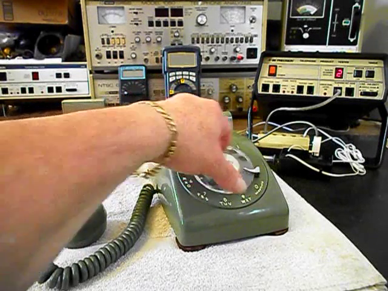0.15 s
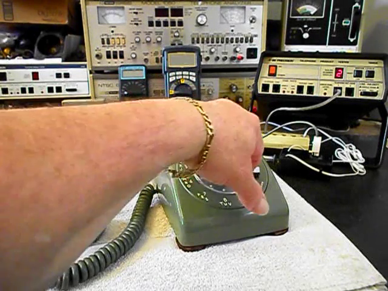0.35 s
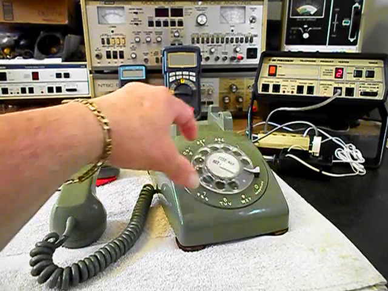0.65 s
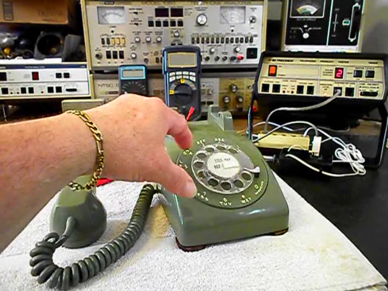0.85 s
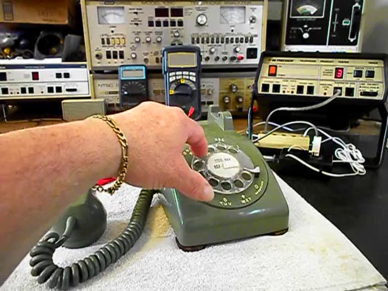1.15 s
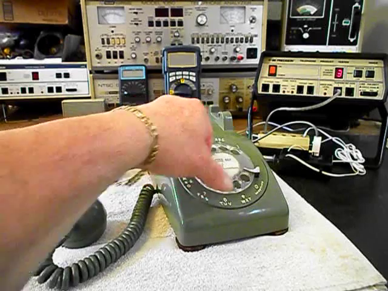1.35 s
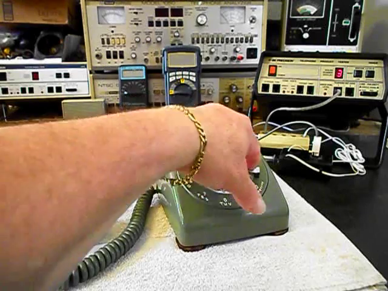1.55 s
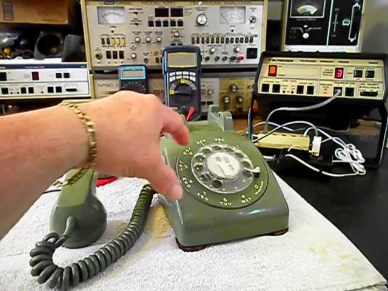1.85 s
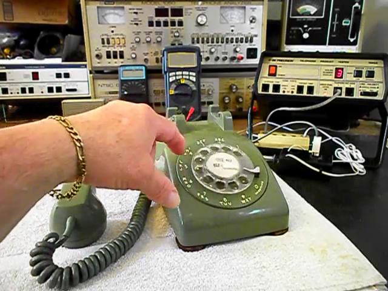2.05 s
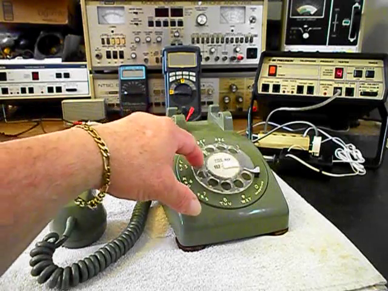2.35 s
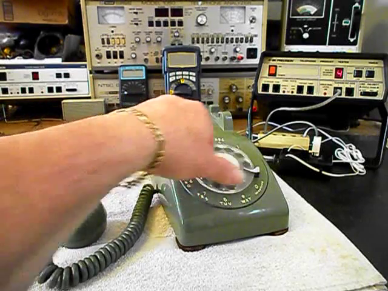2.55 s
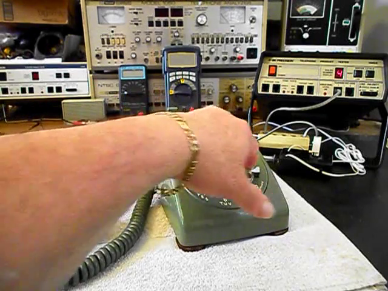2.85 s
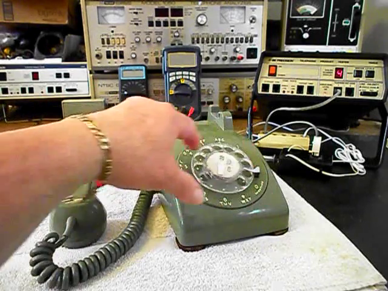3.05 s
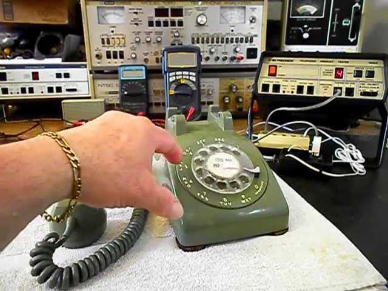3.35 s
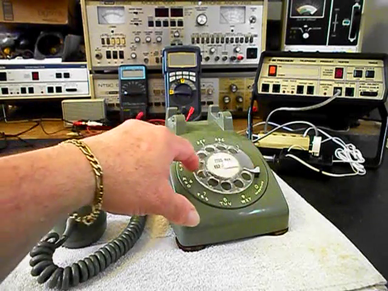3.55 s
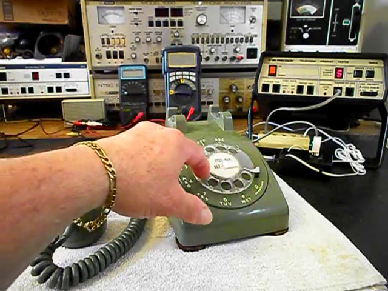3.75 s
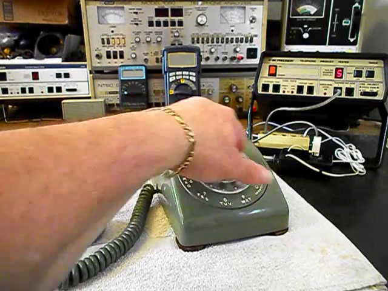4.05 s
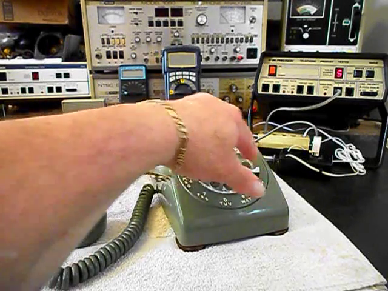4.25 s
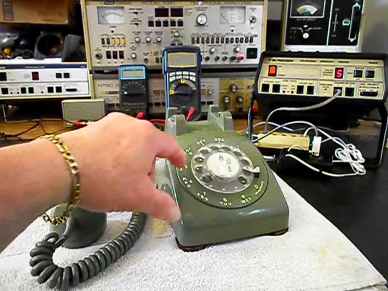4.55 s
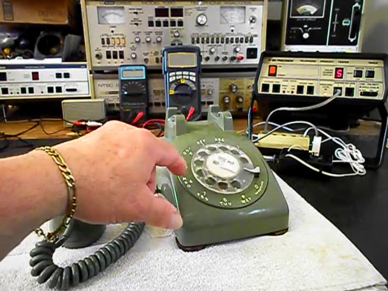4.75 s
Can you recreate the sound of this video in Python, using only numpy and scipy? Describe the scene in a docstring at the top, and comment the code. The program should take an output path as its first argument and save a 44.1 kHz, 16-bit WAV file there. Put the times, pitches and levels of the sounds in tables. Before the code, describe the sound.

A rotary desk telephone is dialled four times, heard close in a small workshop with a short, soft echo, quiet air and barely audible electrical hum. At the very start a fingertip taps into a hole; the wheel is pulled with a brief rattling rasp and knocks the stop at 0.27 s. A small click at 0.4 frees it, and it whirrs back, a low-pitched buzzing of gears with a fine brake hiss, clacking home at 0.8. The second grip comes at 1.3, knock at 1.5, return from 1.63 to a clack at 2.1. The third grips at 2.43, knocks at 2.7 and whirrs from 2.84 to 3.39. The fourth grips at 3.8, knocks hardest at 4.1, gives a louder slip click near 4.23 and runs longest, clacking at 4.87. Each whirr quickly reaches speed, then slows and softens slightly. Tiny finger brushes and nail ticks come between turns.

```python
"""Close by, a rotary desk telephone is dialled four times in a small workshop with a faint hum.
Each time a finger drops into a hole, winds the wheel round with a rasp and knocks on the finger stop.
The spring then runs the wheel back: gears whirr, a brake hisses, and the wheel clacks home.
Blows are short bursts of random pulses through filters, plus a ringing case.
Rubbing is a stream of tiny random contacts; the gears add tones that follow the wheel's speed."""
import sys
import numpy as np
from scipy import signal
from scipy.fft import rfft, irfft, next_fast_len
from scipy.io import wavfile
from scipy.ndimage import map_coordinates

SR = 44100
rng = np.random.default_rng(int(sys.argv[2]) if len(sys.argv) > 2 else 0)


def unload_audio(sound):
    """Save the sound as a 16-bit wav file, at the path given as the first command line argument."""
    columns = np.transpose(np.atleast_2d(sound))
    # keep every value between -1 and 1, then stretch to whole-number steps
    steps = np.round(np.clip(columns, -1, 1) * 32767)
    wavfile.write(sys.argv[1], SR, steps.astype(np.int16))


N = 216451
T = np.arange(N) / SR  # the whole scene, in seconds
HIT_T = np.arange(SR // 2) / SR  # the half second allowed for one blow

# Background air noise. Each row: frequency in Hz, relative level in dB per Hz.
AIR_COLOUR = [(25, -35), (70, -8.5), (115, -1), (200, -2.5), (400, 1), (700, -8), (1000, -8), (1500, -12),
              (2500, -10.5), (3900, -16), (6800, -21), (8000, -39)]
# Steady hum of the bench instruments. Each row: frequency in Hz, relative level in dB.
HUM_TONES = [(398.4, -74.5), (662.1, -62), (899.0, -68.5), (2482, -72)]
# How fast the room's echo dies. Each row: frequency in Hz, time to fall by 60 dB in seconds.
ROOM_DECAY = [(150, 0.79), (500, 0.3), (2000, 0.36), (7000, .36)]
# Ringing of the case and its metal parts.
# Each row: frequency in Hz, relative level in dB, time to fall by 60 dB in seconds.
CASE_MODES = [(360.3, 3.5, 0.095), (462.4, 7, 0.083), (538, 0, .09), (916, -6, 0.17), (1085, -7.5, 0.086),
              (1616, -14.5, 0.24), (2214, -23, 0.26), (2600, -20.5, 0.12)]

# The next ten tables are sound colours. Each row: frequency in Hz, relative level in dB per Hz.
# The fingertip's soft thud.
THUD_COLOUR = [(80, -28.5), (250, -9.5), (420, 4.5), (700, -10), (1000, -4), (1600, -22.5), (3000, -59)]
# The wheel's plastic click.
PLASTIC_COLOUR = [(600, -36.5), (1200, -5), (1900, 0), (2500, 3.5), (3200, -13.5), (5000, -42)]
# The fingernail's tick.
TICK_COLOUR = [(2000, -27), (3500, -11.5), (4400, 10), (5500, -4.5), (7300, -5), (8300, -35.5)]
# The knock on the finger stop.
KNOCK_COLOUR = [(59, -65.5), (100, -27), (354, -13), (661, -9.5), (1050, 4), (1650, -13.5), (2180, -14.5),
                (2610, -7.5), (3030, -17), (3770, -23), (4530, -17.5), (6780, -15.5), (7570, -38),
                (8000, -29.5), (10400, -61), (17600, -120)]
# The wheel hitting its rest.
CLACK_COLOUR = [(60, -34.5), (150, -16.5), (270, -13), (400, -2.5), (600, -1), (950, -0.5), (1350, -8),
                (1700, -2.5), (2100, -6), (3200, -4.5), (3900, -8.5), (4500, 0.5), (5200, -7.5), (6900, -5),
                (7500, -14), (8300, -27)]
# The shivering spring.
SPRING_COLOUR = [(4000, -36), (6100, -20.5), (6650, 5.5), (7100, 2), (7500, -23), (8300, -52.5)]
# Loose gears rattling during a pull.
RATTLE_COLOUR = [(88, -55.5), (150, -24), (205, -27), (301, -15.5), (483, 3), (570, -5), (640, -0.5),
                 (720, -7.5), (828, -10), (906, 5), (980, -9.5), (1100, -0.5), (1200, -16.5), (1268, -4.5),
                 (1350, -15.5), (1550, -18.5), (2200, -25), (2860, -39.5), (4840, -120)]
# The clutch scraping during a pull.
SCRAPE_COLOUR = [(1000, -38), (1700, -10), (2320, -8.5), (2690, -3.5), (3010, -17), (3320, -6),
                 (3810, -18.5), (4210, -1.5), (4510, 0), (5100, -7), (5600, -5.5), (6070, -11), (7140, -5),
                 (7500, -18), (9750, -39.5), (16500, -120)]
# The gears as heard through the case on the way back.
GEAR_COLOUR = [(100, -33), (260, -21.5), (350, -3), (460, 2.5), (620, -5), (780, -13.5), (900, 2.5),
               (1000, -2), (1110, -2), (1330, -19.5), (1460, -11.5), (1700, -13), (2400, -13),
               (3200, -18.5), (3900, -33)]
# The hissing brake shoes.
BRAKE_COLOUR = [(2800, -73), (3400, -9), (3850, -15), (4150, -3.5), (4500, 6.5), (4850, -12), (5400, -9),
                (6200, -9.5), (6900, -5.5), (7600, -15), (8300, -67.5)]

# The finger drops into a hole. Each row: start in seconds, level in dB, nail tick in relative dB.
GRIPS = [(0.0187, -19, -20), (1.3084, -19.5, -34.5), (2.4306, -22.5, -26), (3.7945, -25.5, -29)]
# Make-up of a grip: thud in relative dB, plastic click in relative dB.
GRIP_MIX = (-14, -12)
# The hovering hand brushes the wheel. Each row: start in seconds, level in dB, nail tick in relative dB.
BRUSHES = [(0.067, -30, -32), (1.075, -40, -13.5), (1.202, -36, -19), (2.313, -33.5, -22),
           (2.377, -34.5, -3), (3.542, -27, -14), (3.683, -34.5, -12), (3.834, -45.5, 1.5)]
# Make-up of a brush: thud in relative dB, plastic click in relative dB.
BRUSH_MIX = (-8, -11.5)
# Make-up of the finger slipping off: thud, plastic click and nail tick, all in relative dB.
RELEASE_MIX = (-14, -14.5, -13.5)
# The finger hits the stop.
# Each row: start in seconds, level in dB, nail tick in relative dB, low thump in relative dB.
STOPS = [(0.272, -7, -11.5, -32.5), (1.507, -10, -17, -33.5), (2.716, -8, -4.5, -39),
         (4.108, -5, -8.5, -24)]
# The wheel is pulled round. Each row: start in seconds, attack length in seconds, end in seconds,
# gear rattle in relative dB, scrape in dB, growth in dB per second,
# moment of the hardest shove in seconds, shove in dB.
PULLS = [(0.113, 0.049, 0.272, -29, -29.5, 13.5, 0.183, 2),
         (1.354, .044, 1.505, -24, -26, 55.5, 1.452, 1.5), (2.48, 0.027, 2.714, -25, -28, 40, 2.602, 5.5),
         (3.866, 0.013, 4.105, -25, -26, 48, 3.89, 5.5)]
# The wheel runs back; the finger's slipping-off click falls near its start,
# in the fourth row shortly after it. Each row: slipping-off click in seconds, its level in dB,
# wheel start in seconds, gears in relative dB, brake hiss in relative dB,
# arrival home in seconds, clack level in dB.
RETURNS = [(0.384, -19.5, 0.41, -35, -39, 0.79, -5), (1.609, -22.5, 1.627, -34, -38.5, 2.098, -4),
           (2.814, -17, 2.838, -34, -38, 3.389, -4), (4.2267, -10.5, 4.17, -35, -39.5, 4.869, -4)]
# Tones of the gear train. Each row: multiple of the governor's speed, relative level in dB.
GEAR_TONES = [(4, 3.5), (5, -6.5), (6, -10.5), (7, -11), (8, 3), (10, -13.5), (12, 0), (14, -1.5),
              (16, -1.5)]

# Winding: a pull's edges, its shove and its build-up
PULL_FADE_IN_S, PULL_FADE_OUT_S = .024, 0.0076  # the finger takes up the wheel; the stop halts it
SHOVE_WIDTH_S = 0.0181  # half length of a shove
GEAR_LAG_S = .016  # the gears answer a shove after the clutch
RATTLE_ATTACK_DB, SCRAPE_ATTACK_DB = 16, 10  # rise over the attack
SCRAPE_GROWTH = 0.64  # the scrape's share of the growth against the spring
TOOTH_HZ, TOOTH_RISE = 466.7, 1.3  # tooth rate of a light pull, relative rise per unit of rattle

# Running back: speed, loudness and the pulse cam
GOVERNOR_HZ, SPIN_UP_S = 88.8, .03  # speed at the end of travel, time constant of the run-up
SPEED_PER_S, GEAR_DB_PER_S, BRAKE_DB_PER_S = .062, 5.5, 2  # extra for each second of travel left
CAM_GEAR_DB, CAM_BRAKE_DB = 0.6, 1.5  # swing up and down with each digit step
CAM_GEAR_AT, CAM_BRAKE_AT = 0.57, 0.88  # where in a step each is loudest, as a share of the step
LURCH_DB = 1  # the gears strain before the governor bites fully

CASE_UNDER_CLACK_DB = -23
TOP_HZ = 8900  # upper band limit


def amp(db):
    """Turn decibels into a gain."""
    return 10 ** (np.asarray(db) / 20)


def unit(x):
    """Scale a sound to an average (rms) strength of 1."""
    return x / np.sqrt(np.mean(x ** 2) + 1e-20)


def along(points, hz):
    """Read a value between (Hz, value) points, on a logarithmic frequency axis."""
    f, v = np.transpose(points)
    return np.interp(np.log(hz + 1), np.log(f + 1), v)


def wobble(rate):
    """A smooth random curve with rate fresh random values a second."""
    knots = rng.standard_normal(int(N * rate / SR) + 4)
    return map_coordinates(knots, [T * rate])


def coloured(x, points, size=4096):
    """Give x a colour with a filter of energy 1 that never sounds ahead of its input."""
    level_db = along(points, np.fft.rfftfreq(size, 1 / SR))
    # folding the cepstrum forward makes the filter respond as early as it can
    cepstrum = irfft(np.log(amp(level_db)))
    cepstrum[1:size // 2] *= 2
    cepstrum[size // 2 + 1:] = 0
    response = irfft(np.exp(rfft(cepstrum)))
    return signal.fftconvolve(x, response / np.linalg.norm(response))[:len(x)]


def grains(rate, spread_db):
    """Tiny random contacts, about rate a second, with sizes spread by spread_db; rms 1."""
    happens = rng.random(N) < rate / SR
    sign = rng.choice([-1, 1], N)
    return unit(happens * sign * amp(spread_db * rng.standard_normal(N)))


def add(track, s, sound):
    """Mix a sound into the track at time s."""
    part = track[max(0, round(s * SR)):][:len(sound)]
    part += sound[:len(part)]


def chatter(colour, hold, t60):
    """Parts chatter against each other for hold seconds, then fall by 60 dB in t60 seconds."""
    envelope = amp(-60 * np.maximum(HIT_T - hold, 0) / t60)
    return coloured(envelope * rng.choice([-1, 1], len(HIT_T)), colour)


def case_ring(vary_db=2):
    """The case rings as fading sine waves, with new strengths at each blow."""
    ring = np.zeros(len(HIT_T))
    for hz, db, t60 in CASE_MODES:
        level = amp(db + vary_db * rng.standard_normal() - 60 * HIT_T / t60)
        ring += level * np.sin(2 * np.pi * (hz * HIT_T + rng.random()))
    return ring * (1 - np.exp(-HIT_T / 0.0031))  # a soft start


def contact(thud_db, plastic_db, tick_db):
    """One light contact: the fingertip's thud, the wheel's plastic click and the nail's tick."""
    thud = amp(thud_db) * chatter(THUD_COLOUR, hold=0.0022, t60=0.074)
    click = amp(plastic_db) * chatter(PLASTIC_COLOUR, hold=0.0014, t60=0.036)
    tick = amp(tick_db) * chatter(TICK_COLOUR, hold=0.0013, t60=0.025)
    return thud + click + tick


def quiet_air():
    """The air of the room: soft, steady coloured noise."""
    return amp(-54.5) * coloured(rng.standard_normal(N), AIR_COLOUR)


def instrument_hum():
    """The bench instruments hum: faint tones whose phase drifts a little."""
    hum = np.zeros(N)
    for hz, db in HUM_TONES:
        hum += amp(db + 0.5) * np.sin(2 * np.pi * hz * T + 0.84 * wobble(16))
    return hum


def room(x, size=8192):
    """The workshop's short, diffuse echo, each frequency dying at its own speed."""
    out = np.zeros(N)
    build_up = np.clip(HIT_T / 0.0074, 0, 1)
    # each block of sound gets a fresh random tail
    for start in range(0, N, size):
        hz, t, z = signal.stft(rng.standard_normal(len(HIT_T)), SR, nperseg=256)
        fade = amp(-60 * t / along(ROOM_DECAY, hz)[:, None])
        noise = signal.istft(z * fade, SR, nperseg=256)[1]
        tail = build_up * noise[:len(HIT_T)]
        add(out, start / SR, signal.fftconvolve(x[start:start + size], tail / np.linalg.norm(tail)))
    return out


def touches():
    """Light contacts: the finger enters a hole, slips out after the pull, or brushes the wheel."""
    out = np.zeros(N)
    for s, db, tick_db in GRIPS:
        add(out, s, amp(db) * contact(*GRIP_MIX, tick_db))
    for s, db, *_ in RETURNS:
        add(out, s, amp(db) * contact(*RELEASE_MIX))
    for s, db, tick_db in BRUSHES:
        add(out, s, amp(db) * contact(*BRUSH_MIX, tick_db))
    return out


def finger_stop():
    """A nail tick and a knock fall together on the stop; a second knock and the case follow."""
    out = np.zeros(N)
    for s, db, tick_db, thump_db in STOPS:
        add(out, s, amp(db + tick_db - 7.0) * chatter(TICK_COLOUR, hold=0.0053, t60=0.02))
        add(out, s, amp(db - 11.0) * chatter(KNOCK_COLOUR, hold=0.0029, t60=0.027))
        add(out, s + .004, amp(db - 7.5) * chatter(KNOCK_COLOUR, hold=0.0025, t60=0.042))
        add(out, s + 0.00396, amp(db - 17) * case_ring())
        # the push rocks the whole telephone on its feet
        swing = (1 - np.exp(-HIT_T / .012)) * amp(-60 * HIT_T / .24)
        thump = swing * np.sin(2 * np.pi * 224 * HIT_T)
        add(out, s + 0.0043, amp(db + thump_db + 0.5) * thump)
    return out


def clacks():
    """The wheel hits its rest and chatters; the case rings in answer and the spring shivers."""
    out = np.zeros(N)
    for *_, s, db in RETURNS:
        add(out, s + .0021, amp(db - 9) * chatter(CLACK_COLOUR, hold=0.0042, t60=0.018))
        add(out, s + 0.00485, amp(db + CASE_UNDER_CLACK_DB) * case_ring())
        add(out, s + 0.0028, amp(db - 35.0) * chatter(SPRING_COLOUR, hold=0.003, t60=0.48))
    return out


def pull_gain(level_db, attack_db, growth_db_per_s, start, attack, end, shove_s, shove_db):
    """One pull: an attack, a steady growth against the spring with one shove, and a quick release."""
    rise = np.clip((T - start) / attack, 0, 1) ** 2
    shove = shove_db * np.exp(-((T - shove_s) / SHOVE_WIDTH_S) ** 2)
    edges = [start - PULL_FADE_IN_S, start, end, end + PULL_FADE_OUT_S]
    gate = np.interp(T, edges, [0, 1, 1, 0]) ** 2
    still_to_grow = growth_db_per_s * np.clip(end - T, 0, 1)
    return gate * amp(level_db - attack_db * (1 - rise) - still_to_grow + shove)


def winding():
    """The gears growl and rattle and the slipping clutch scrapes as the wheel is pulled round."""
    rattle, scrape = np.zeros((2, N))
    for start, attack, end, rattle_db, scrape_db, growth, shove_s, shove_db in PULLS:
        rattle += pull_gain(rattle_db, RATTLE_ATTACK_DB, growth,
                            start, attack, end, shove_s + GEAR_LAG_S, shove_db)
        scrape += pull_gain(scrape_db, SCRAPE_ATTACK_DB, SCRAPE_GROWTH * growth,
                            start, attack, end, shove_s, shove_db)
    # a harder pull runs the teeth faster; the hand is never steady
    tooth_hz = TOOTH_HZ * (1 + TOOTH_RISE * rattle + .025 * wobble(25) + 0.0632 * wobble(300))
    tooth = 2 * np.pi * np.cumsum(tooth_hz) / SR
    # the growl is the tooth tone and its octave, each swelling by itself
    low_swell, high_swell = amp(3 * wobble(55)), amp(3 * wobble(55))
    growl = unit(low_swell * np.sin(tooth) + amp(-2.0) * high_swell * np.sin(2 * tooth))
    loose = amp(1.1 * wobble(60)) * coloured(grains(rate=900, spread_db=0.0), RATTLE_COLOUR)
    # the scrape is uneven and pulses with every tooth
    uneven = amp(1.6 * wobble(130) + .7 * wobble(35)) * (1 + .5 * np.cos(tooth))
    rasp = unit(coloured(grains(rate=4100, spread_db=2.0) * uneven, SCRAPE_COLOUR))
    return rattle * (amp(-5.5) * growl + amp(-2) * loose) + scrape * rasp


def running_back():
    """The wheel speeds up until the governor bites, then slows and softens as the spring unwinds."""
    speed, gear, brake, slack = np.zeros((4, N))
    for _, _, start, gear_db, brake_db, home, _ in RETURNS:
        spin_up = 1 - np.exp(-np.maximum(T - start, 0) / SPIN_UP_S)
        bite = spin_up ** 3
        moving = (T > start) * np.clip((home + .014 - T) / 0.022, 0, 1)
        tension = np.clip(home - T, 0, 1)  # seconds of travel left in the spring
        # the pulse cam loads brake and gears in turn, once for each digit step
        steps = tension * GOVERNOR_HZ / 8
        lurch = LURCH_DB * np.sin(np.pi * bite)
        gear_load = CAM_GEAR_DB * np.cos(2 * np.pi * (steps - CAM_GEAR_AT)) + lurch
        brake_load = CAM_BRAKE_DB * np.cos(2 * np.pi * (steps - CAM_BRAKE_AT))
        speed += (moving > 0) * spin_up * GOVERNOR_HZ * (1 + SPEED_PER_S * tension)
        gear += moving * spin_up ** 1.1 * amp(gear_db + GEAR_DB_PER_S * tension + gear_load)
        brake += moving * spin_up ** 2.2 * amp(brake_db + BRAKE_DB_PER_S * tension + brake_load)
        slack += moving * (1 - spin_up)  # unloaded teeth clatter instead of singing
    turn = 2 * np.pi * np.cumsum(speed * (1 + .002 * wobble(30))) / SR
    # each gear tone is as loud as the case lets it be at its present pitch
    tones = np.zeros(N)
    for order, db in GEAR_TONES:
        level = db + along(GEAR_COLOUR, order * speed) + 1.1 * wobble(25)
        play = .17 * wobble(50) + .5 * slack * wobble(250)  # the phase jitters
        tones += amp(level) * np.sin(round(order) * turn + play + 2 * np.pi * rng.random())
    # tooth contacts come in bunches, once a governor turn
    bunches = grains(rate=5000, spread_db=3.0) * (1 + 0.34 * np.cos(turn))
    teeth = amp(2 * slack) * unit(coloured(bunches, GEAR_COLOUR))
    # the brake shoes rub unevenly, hardest once a governor turn
    rub = amp(1.5 * wobble(70) + .9 * wobble(28)) * (1 + 0.16 * np.cos(turn))
    hiss = unit(coloured(rub * grains(rate=4500, spread_db=2.0), BRAKE_COLOUR))
    whirr = gear * amp(-4.5) * teeth + brake * hiss
    return gear * amp(-3.5) * tones, whirr


def scene():
    """The telephone, its echo, the quiet air and the hum of the room."""
    tones, whirr = running_back()
    rubbing = winding() + whirr
    blows = clacks() + finger_stop() + touches()
    echo = room(amp(-7) * rubbing + amp(-9.0) * blows + amp(-24.5) * tones)
    return (tones + rubbing + blows + echo + quiet_air() + instrument_hum())[None]


def record(dry):
    """Cut a narrow notch just under the upper band limit and fade steeply above that limit."""
    size = next_fast_len(N + SR // 2)
    hz = np.fft.rfftfreq(size, 1 / SR)
    notch = amp(-35 * np.exp(-((hz - 8020) / 210) ** 2))
    band_limit = 1 / np.sqrt(1 + (hz / TOP_HZ) ** 160)
    return irfft(rfft(dry, size) * notch * band_limit, size)[:, :N]


dry = scene()
out = record(dry)
unload_audio(out)
```